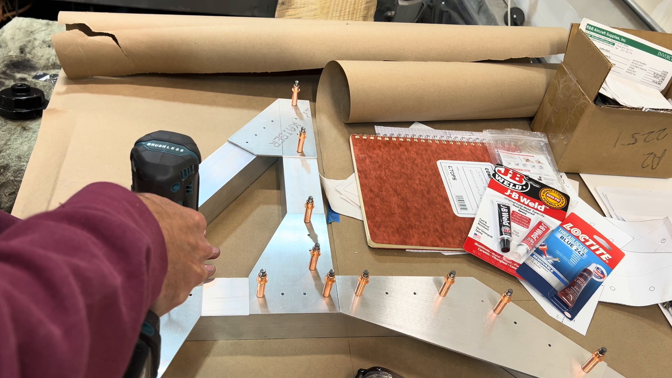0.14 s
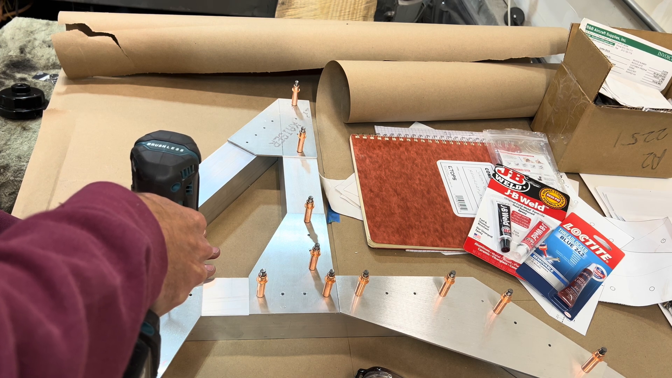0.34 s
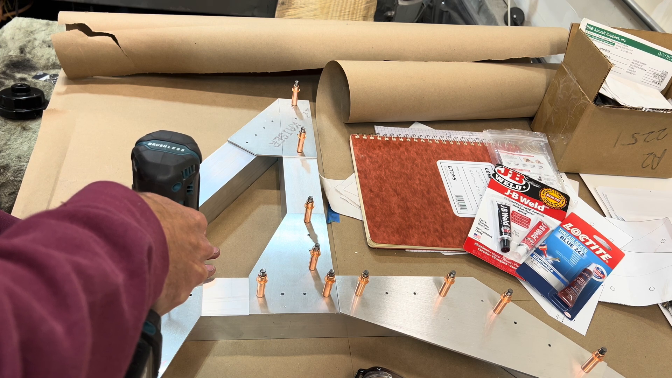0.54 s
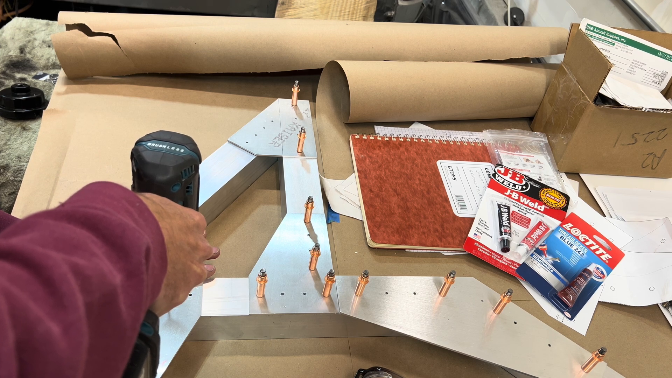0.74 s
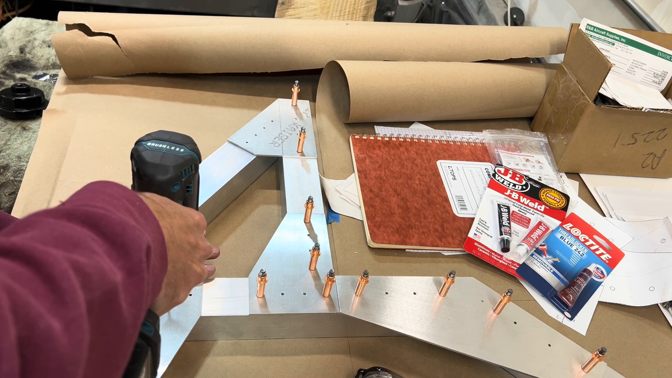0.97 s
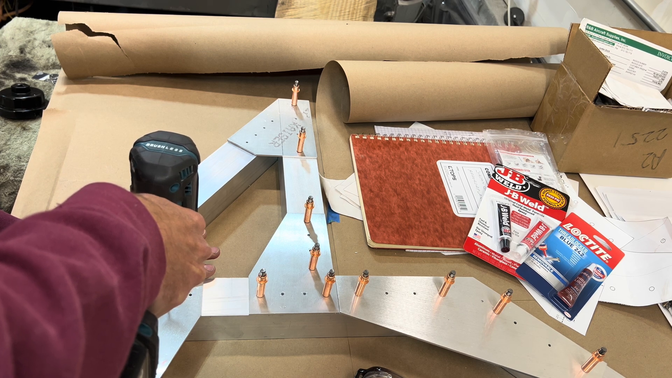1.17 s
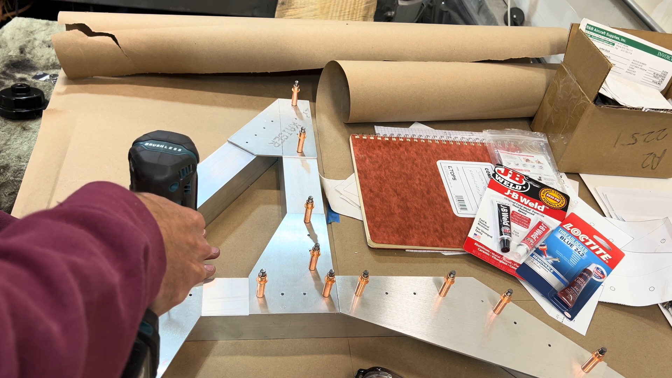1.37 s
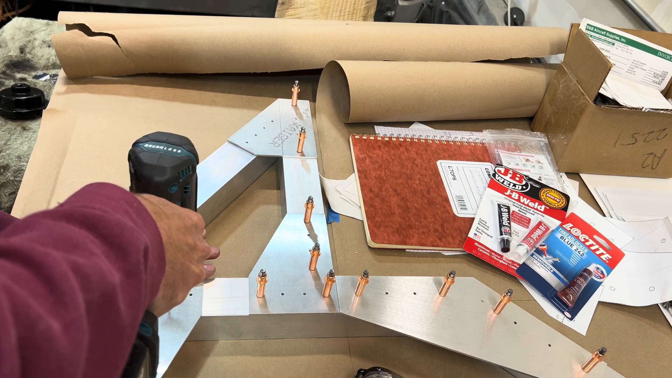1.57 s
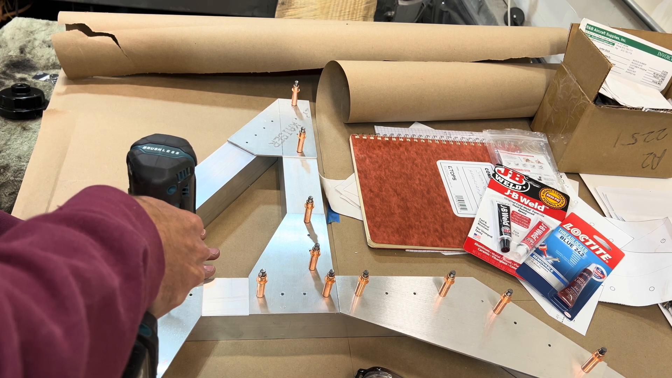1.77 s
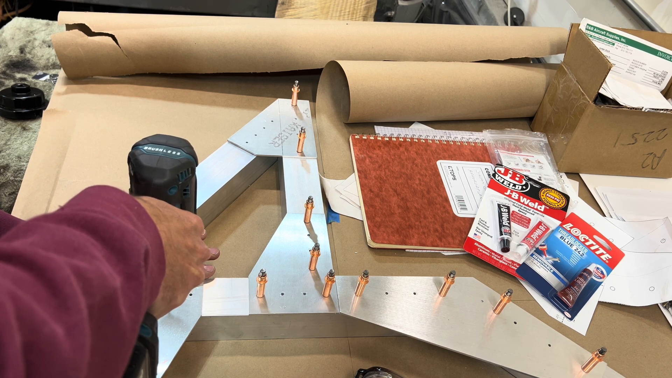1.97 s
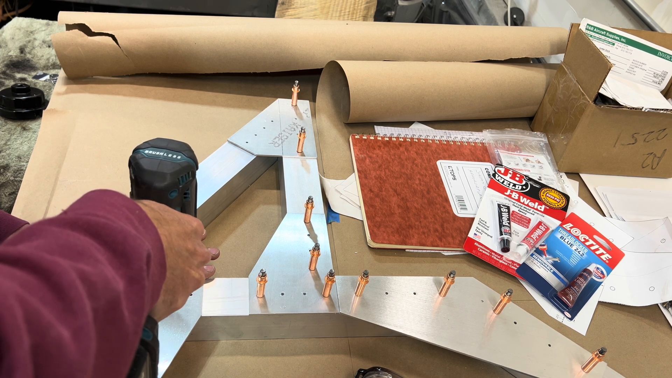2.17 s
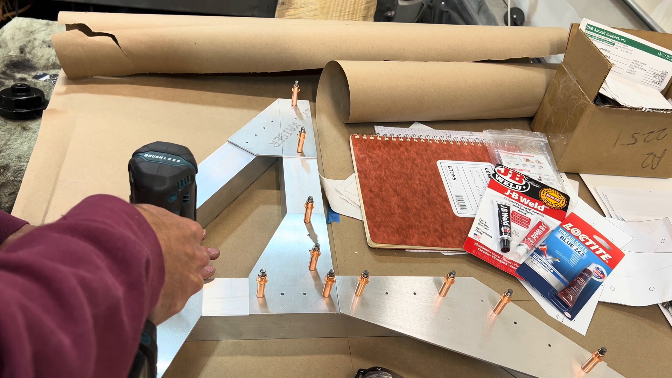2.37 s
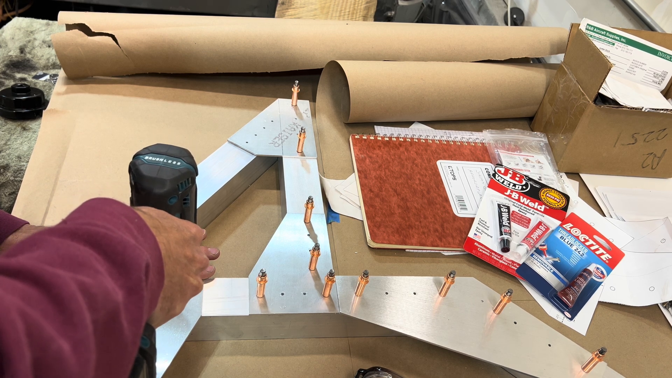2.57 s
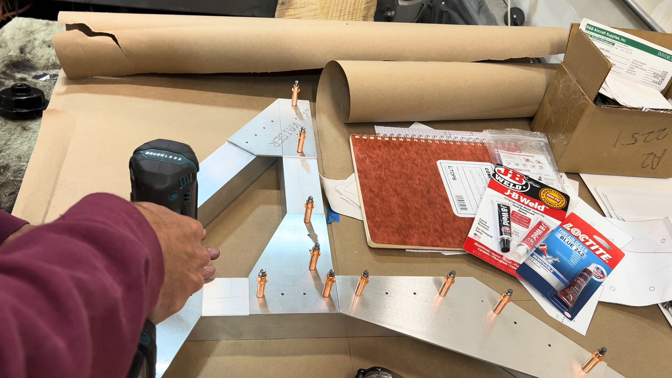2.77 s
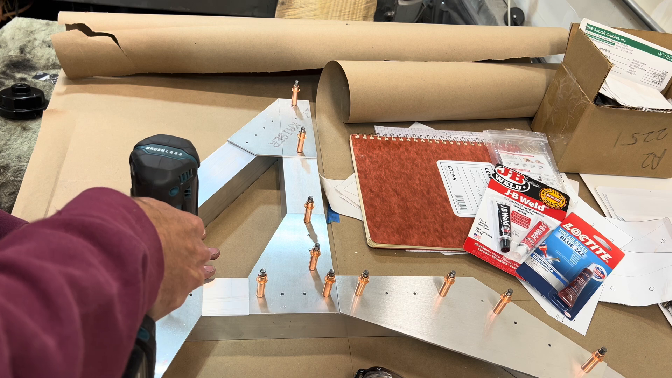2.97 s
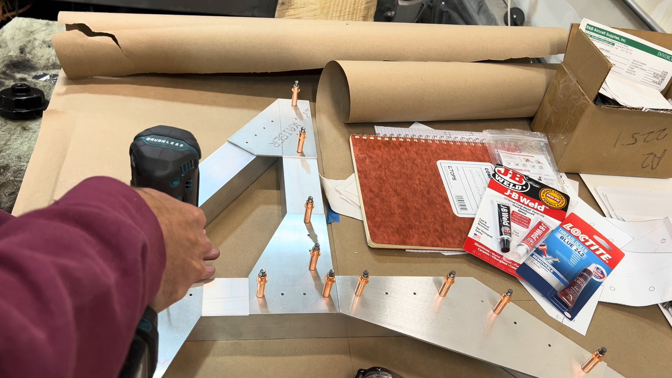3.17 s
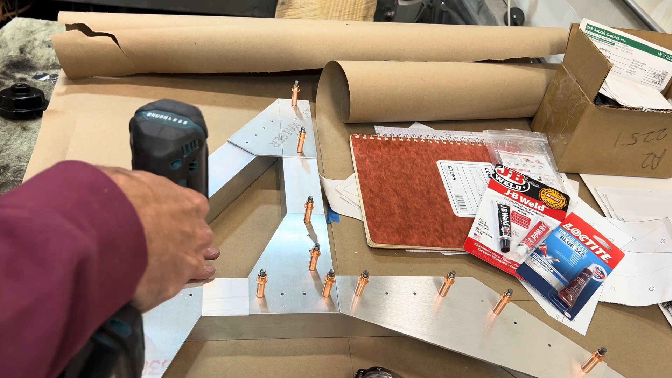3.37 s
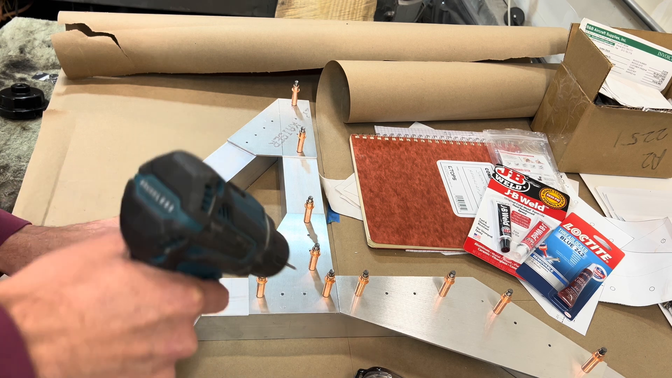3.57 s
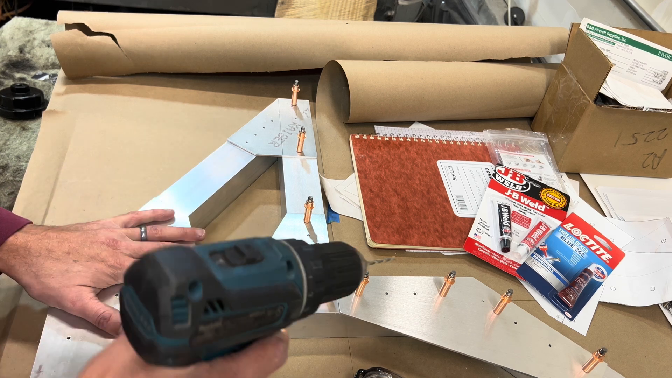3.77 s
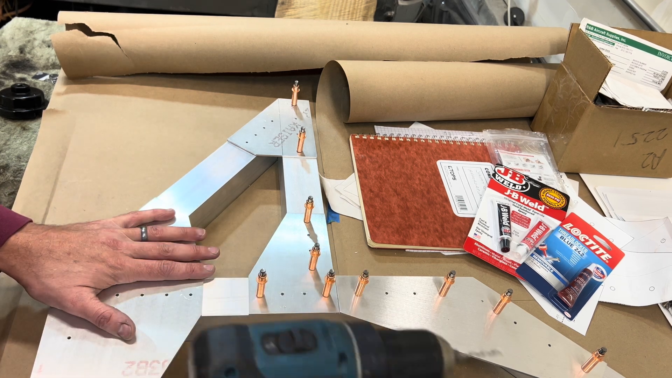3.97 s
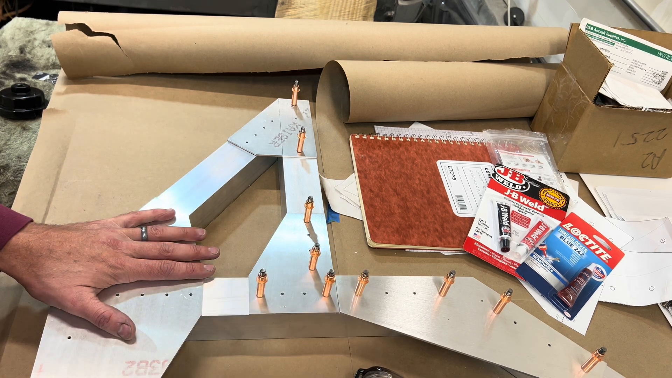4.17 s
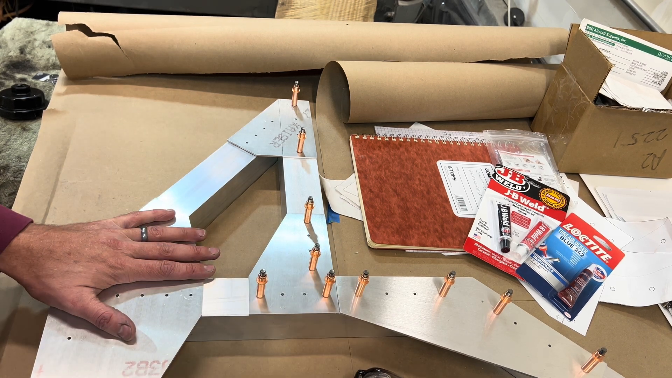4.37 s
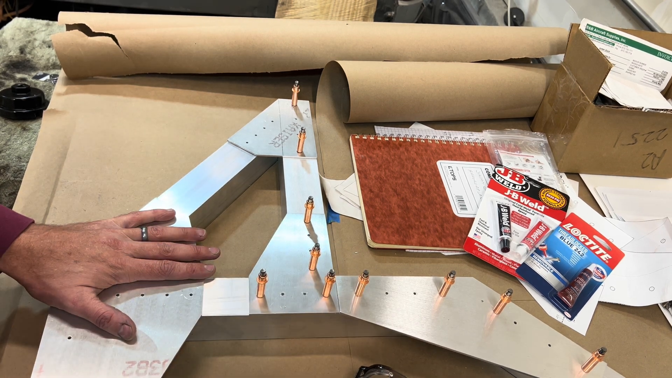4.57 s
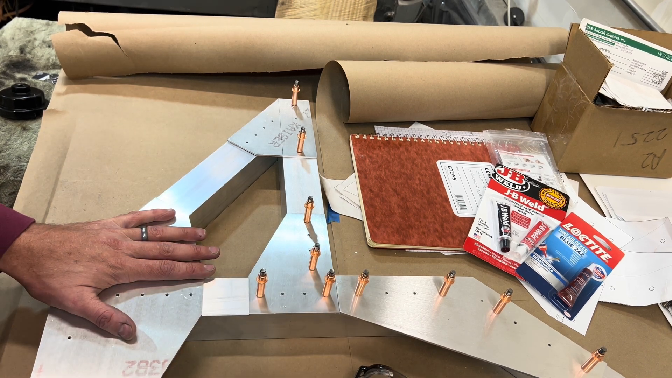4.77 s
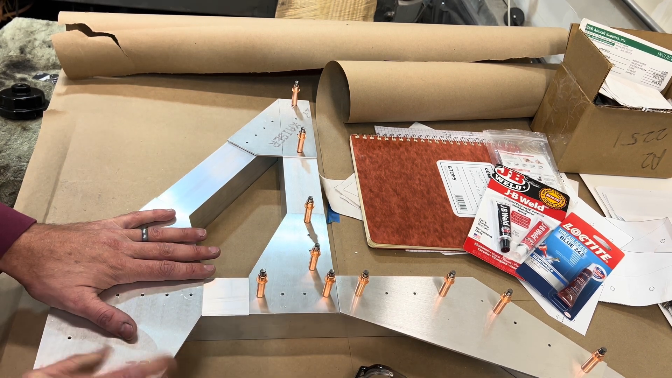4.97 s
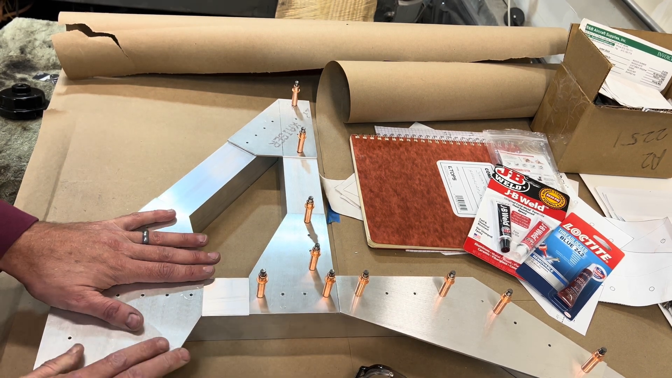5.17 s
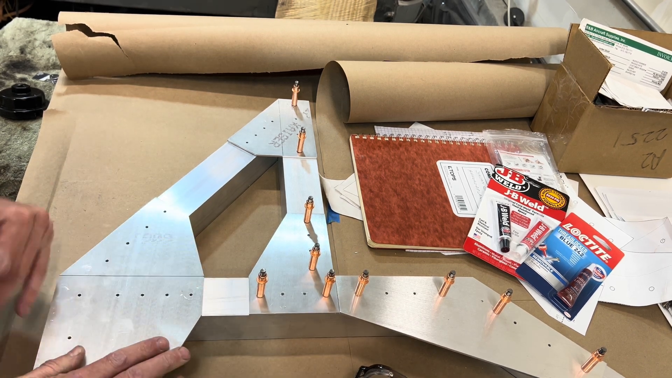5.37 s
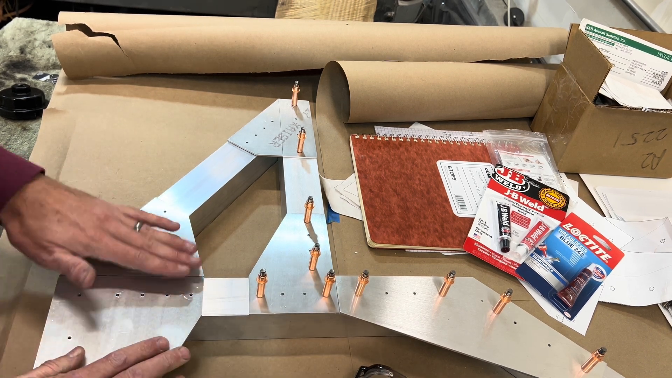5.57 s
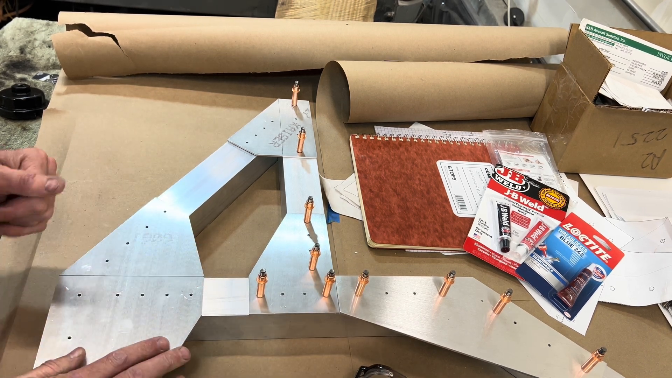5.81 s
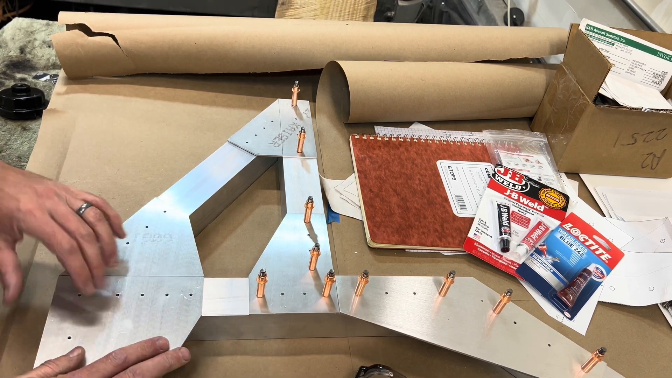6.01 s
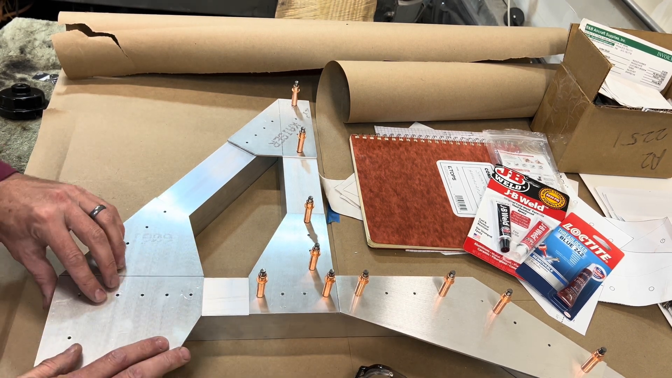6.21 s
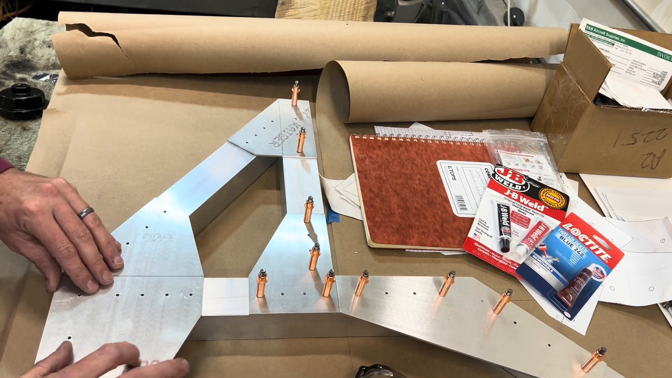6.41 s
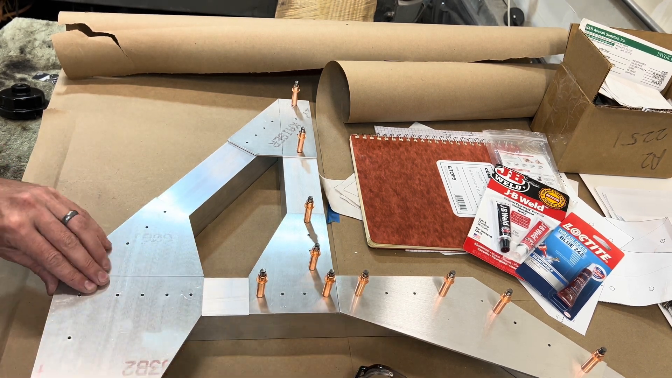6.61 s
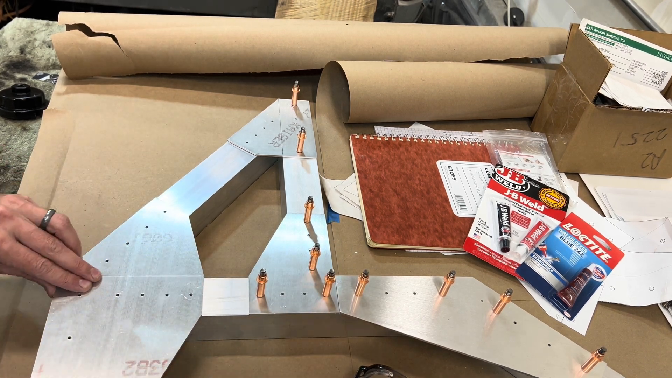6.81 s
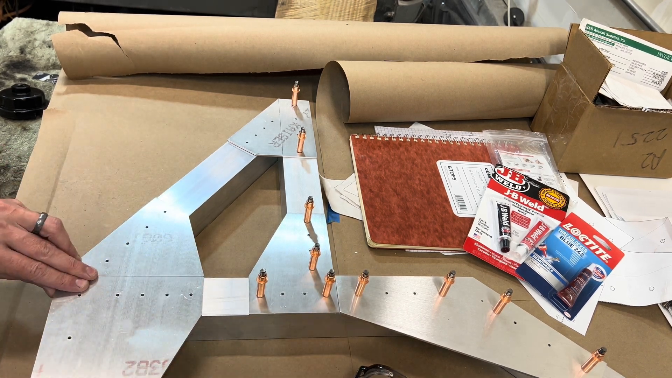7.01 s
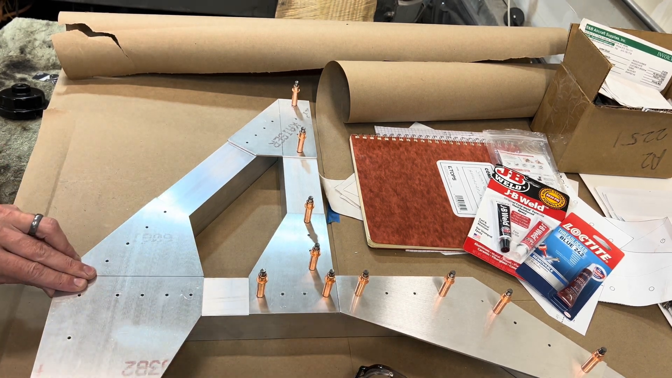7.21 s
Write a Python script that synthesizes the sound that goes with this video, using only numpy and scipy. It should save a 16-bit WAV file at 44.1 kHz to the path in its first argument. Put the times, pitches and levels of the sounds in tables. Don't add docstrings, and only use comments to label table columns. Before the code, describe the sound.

A close stereo pickup in a small, lightly reverberant workshop. From 0 to about 3.4 seconds a cordless drill bores steadily through aluminium sheet: dense, bright gear rattle, metallic cutting hiss, a throbbing whine around 1.2 kHz with thinner high tones, and low bench shaking. The pitch sags slightly near 1.5 seconds, then recovers. Around 3.4 the motor brakes abruptly, leaving faint cloth rubbing and quiet room air. At 4.27 the tool lands with a strong, hollow bench thud and a hard plastic click, followed until about 5.4 by weaker rocking thuds, knocks, clicks and low booming. Airy palm wipes and paper scrapes swell near 5.25 and 5.65, with small ticks. Softer taps and brushing continue from 6.1. At 6.55 the sheet gives a sharp, bright snap with tiny bounces, slightly left, then light sliding fades to about 7 seconds.

```python
import sys
import numpy as np
from scipy import signal
from scipy.fft import rfft, irfft
from scipy.io import wavfile
from scipy.ndimage import uniform_filter1d

SR = 44100
rng = np.random.default_rng(int(sys.argv[2]) if len(sys.argv) > 2 else 0)


def voltage_ratio(level):
    return 10 ** (np.asarray(level, float) / 20)


def to_wav(s):
    ch = np.atleast_2d(s).T
    pcm = np.round(np.clip(ch, -1, 1) * 32767)
    wavfile.write(sys.argv[1], SR, pcm.astype(np.int16))


N = 319725
T = np.arange(N) / SR
HZ = np.fft.rfftfreq(N + 8192, 1 / SR)
SIDES = np.array([[.5], [-.5]])

# pitch_hz, level_db
AIR_COLOUR = [(15, -41), (25, -11), (70, -2.5), (193, -18), (517, -18), (846, -28), (1610, -16),
              (2970, -31), (9000, -37), (12500, -42.5), (16000, -50.5)]
# pitch_hz, t60_s
SHOP_DECAY = [(100, 0.49), (400, 0.31), (1200, 0.51), (3000, 0.55), (5000, 0.43), (9000, 0.4),
              (12000, 0.11)]
# pitch_hz, left_lead_rad
PORT_LEAD = [(0, 0), (150, 0), (300, -.2), (1120, 1.9), (2050, 3), (3100, 3.85), (3800, 5.9), (6500, 6.9),
             (7200, 9.2), (8600, 6.3), (10200, 3.1), (11900, 0), (13700, -3.1), (15300, -6.3)]
# pitch_hz, likeness_0_to_1
PORT_LIKENESS = [(60, .99), (150, .74), (400, .5), (1200, .75), (2200, .9), (3100, .92), (4200, .94),
                 (5500, .75), (7000, .45), (8700, .7), (10000, .85)]
# pitch_hz, left_minus_right_db
PORT_TILT = [(60, -3), (110, -0.5), (200, 4.5), (380, -0.5), (700, 1.5), (1290, -0.1), (2380, 1.13),
             (4400, 3), (8120, 2.5), (15000, -3)]
# pitch_hz, gap_db
WEAK_SIDE_GAP = [(1500, -30), (1850, -10), (2100, -12.5), (2350, -13), (2650, -11), (3000, -14),
                 (4000, -19), (6500, -12), (7300, -4), (8000, -7), (9000, -8), (9700, -3.5), (16000, -2.5)]

# pitch_hz, level_db_per_hz
WIPE_COLOUR = [(1180, -38), (2000, -5), (2900, -7.5), (3900, -4), (6000, -2.5), (7300, -6.5), (8730, -4.5),
               (12000, -5), (16000, -13.5)]
# pitch_hz, level_db_per_hz
SCRAPE_COLOUR = [(130, -12.5), (350, -15), (800, -7.5), (1200, -10), (2100, -5.5), (2550, -9.5),
                 (2800, -16.5), (5000, -41)]
# pitch_hz, level_db_per_hz
BOOM_COLOUR = [(25, -32.5), (45, -5.5), (62, 0.5), (79, -0.5), (95, -3), (125, -9), (200, -8.5), (300, -30),
               (500, -87)]
# pitch_hz, level_db_per_hz
RUMBLE_COLOUR = [(90, -2), (160, -1.5), (300, 6.5), (500, -4.5), (750, -30.5), (1500, -59.5)]
# pitch_hz, width_hz, level_db
CLOTH_PEAKS = [(2340, 520, -3), (2640, 1250, 3.5), (3780, 320, -8), (6260, 1400, -6.5)]
# time_s, level_db
SLEEVE_CURVE = [
    (3.6, -78.5),
    (3.626, -68),
    (4.036, -77.5),
    (4.28, -86),
    (4.414, -77),
    (5.078, -75.5),
    (5.2, -67),
]
# full_s, rise_s, hold_s, level_db, t60_s
WIPE_STROKES = [(3.44, .01, 0.0059, -49.5, 0.53), (3.83, 0.14, 0.049, -71, 0.8),
                (4.27, 0.026, 0.027, -66.5, 0.8), (4.53, 0.02, 0.0029, -66, 0.13),
                (4.67, .01, 0.0043, -65.5, 1.4), (4.8, .02, .02, -68, .12), (5.08, 0.15, 0.0046, -65, 0.41),
                (5.25, 0.079, 0.083, -47, 0.18), (5.35, .03, .01, -60.5, 0.47),
                (5.617, 0.0053, 0.023, -59.5, .1), (5.645, 0.028, 0.056, -47.5, 0.09),
                (5.72, .03, 0.0091, -60, 0.4), (6.14, 0.054, 0.014, -67.5, 0.14),
                (6.24, 0.0198, 0.085, -70.5, 0.38), (6.37, 0.064, 0.037, -73, 0.16),
                (6.48, 0.042, 0.0064, -65.5, 0.099), (6.56, 0.0075, 0.0044, -63, 0.6),
                (6.66, 0.29, 0.052, -61, 0.68), (6.9, 0.43, 0.098, -77.5, 2.)]
# full_s, rise_s, hold_s, level_db, t60_s
DRAG_STROKES = [(3.44, 0.011, 0.0098, -52.5, 0.69), (4.225, 0.0035, 0.012, -66.5, 0.38),
                (3.85, .1, 0.072, -72.5, 1.6), (4.275, 0.0058, 0.013, -54, 0.62),
                (4.53, 0.041, 0.0077, -58, 0.33), (4.67, 0.011, 0.012, -63, 2.2),
                (5.08, 0.17, .01, -60, 0.46), (5.25, 0.11, 0.0071, -48, 0.35),
                (5.34, .01, 0.015, -60, 0.69), (5.63, 0.036, 0.013, -55.5, 0.46),
                (6.14, 0.12, 0.016, -66.5, 0.77), (6.3, .08, 0.067, -69, 0.39),
                (6.48, 0.045, 0.029, -67.5, 1.2), (6.65, 0.012, 0.13, -59.5, 1.26),
                (7.0, .4, .2, -74.5, 2.)]
# full_s, level_db, t60_s
LEAN_SHIFTS = [(3.48, -66, 0.28), (3.799, -77, 4), (4.29, -42.5, 0.66), (4.431, -46.5, 0.32),
               (4.541, -45, 1), (4.63, -46.5, 0.72), (4.799, -44.5, 2.2), (4.999, -43, 1.6),
               (5.119, -46, 0.53), (5.27, -56.5, 0.46), (5.36, -48, 1.1), (5.651, -51, 0.45),
               (6.1, -54, 0.57), (6.68, -57, 1.1), (7.0, -67.5, 2.4)]
# full_s, level_db, t60_s
PAPER_SLIDES = [
    (3.55, -70, 1.6),
    (3.75, -68, 2.1),
    (4.44, -49, 1),
    (4.67, -49.5, 2.2),
    (5.08, -52.5, 0.33),
    (6.14, -73.5, 1.4),
    (6.75, -62.5, 2.6),
]

# start_s, peak_db, pitch_hz, t60_s
KNOCK_HITS = [(4.2245, -41.5, 2400, 0.056), (4.2245, -53.5, 3780, 0.05), (4.2247, -57.5, 4500, 0.034),
              (4.227, -63.5, 1000, .06), (4.226, -51.5, 1800, 0.035), (4.238, -46.5, 2740, 0.16),
              (4.24, -55.5, 3750, .03), (4.4388, -50.5, 4000, 0.032), (4.44, -51, 1900, 0.043),
              (4.509, -48, 2550, 0.09), (4.521, -49, 2670, 0.072), (4.55, -58, 2650, 0.17),
              (4.63, -65.5, 2650, 0.21), (4.29, -59, 2680, 0.22), (4.332, -46, 980, 0.055),
              (4.578, -55, 1570, .03), (4.838, -59, 1200, 0.014), (4.9495, -51.5, 950, 0.016),
              (5.037, -59, 1040, 0.016), (5.073, -47, 860, 0.032), (5.243, -42, 2000, 0.045),
              (5.245, -40, 4310, 0.058), (5.25, -46, 1250, 0.061), (5.255, -43, 810, 0.042),
              (5.333, -40.5, 456, 0.051), (5.334, -43.5, 760, .07), (5.334, -44, 1550, .03),
              (5.62, -48.5, 700, 0.044), (6.073, -62.5, 794, 0.039), (6.128, -60, 1100, .05),
              (6.321, -58, 704, .03), (6.324, -55, 493, 0.044), (6.394, -58, 450, 0.028),
              (6.078, -72.5, 4830, 0.04), (6.37, -72.5, 4850, .15), (6.24, -68.5, 3630, 0.13),
              (6.138, -65, 3700, 0.032), (6.471, -63, 1760, 0.039), (7.165, -65, 732, 0.059)]
# start_s, peak_db, pitch_hz, left_minus_right_db, bright_edge_db
CLICK_HITS = [(4.2243, -53.5, 2700, 17.5, -28.5), (4.2394, -56, 4400, 7, -25), (4.264, -58, 7000, 11, -6.5),
              (4.2717, -33.5, 802, 11, -23.5), (4.4393, -50.5, 3950, 8.5, -26),
              (4.5106, -53.5, 2650, 9, -33.5), (4.5244, -53, 2340, 14, -25), (4.534, -61, 7000, 8, -2),
              (4.579, -61, 2600, 13, -17.5), (4.6668, -37, 851, 10, -5), (4.7994, -51, 5970, 7, -1),
              (4.9487, -61, 3850, 12, -14), (4.9616, -53.5, 2050, 11, -27.5), (5.0764, -45, 3650, 1, -15.5),
              (5.1706, -54, 3420, 6, -17), (5.1841, -45, 4340, 0.5, -25), (5.2405, -39, 4240, 10, -18),
              (5.6206, -49, 827, -3, -11), (5.6361, -43, 5200, 10, -12), (6.0721, -53.5, 829, 2.5, -15),
              (6.5472, -33.5, 4500, 19.5, 12), (6.6405, -49.5, 1900, 9, -22)]
# pitch_hz, width_hz, level_db
SHELL_PEAKS = [(1890, 190, 0), (2650, 150, 21), (3780, 170, -11), (4510, 520, -30)]
# pitch_hz, level_db, t60_s
SNAP_MODES = [(1190, -16, .2), (1700, 6.5, .032), (1790, -9, .02), (2083, -6, .045), (2304, -7, .09),
              (2654, -1.5, .045), (2988, -5, .05), (3978, -6, .04), (4377, -5, .03), (4823, -5, .02),
              (5600, -4, .012), (6700, -4, .012), (8600, -6, .012)]
# start_s, level_db, loud_low_mode_db
SNAP_HITS = [
    (6.5481, -31, 6.5),
    (6.5604, -31.5, -19),
    (6.563, -39.5, -17.5),
]
# full_s, peak_db, pitch_hz, length_s
BENCH_SWAYS = [(4.298, -29.5, 72, .07), (4.345, -35.5, 75, .06), (4.397, -31.5, 75, .08),
               (4.45, -42, 65, .07), (4.605, -32.5, 79.4, .17), (4.708, -38, 58, .06),
               (4.752, -41, 62, .06), (4.82, -37, 75.4, .08), (4.914, -41, 76, .1),
               (4.998, -37.5, 80.3, .08), (5.064, -37.5, 70, .07), (5.125, -40, 80.4, .09),
               (5.272, -50, 77.2, .06), (5.36, -46, 70, .09), (5.46, -45, 84.5, .06),
               (5.53, -48, 84.5, .07), (5.665, -46, 87, .1)]
# start_s, peak_db, pitch_hz, t60_s
THUD_HITS = [(4.2721, -14, 228.6, 0.25), (4.327, -31, 233, 0.16), (4.373, -21.5, 223, 0.18),
             (4.401, -34, 221, 0.052), (4.521, -22, 243, 0.25), (4.671, -23.5, 237, 0.2),
             (4.798, -28, 213.6, 0.12), (4.87, -36.5, 122, 0.22), (4.972, -35.5, 199, 0.14),
             (5.048, -35.5, 189, 0.11), (5.122, -32.5, 222, 0.075), (5.249, -36.5, 217, 0.074),
             (5.298, -42, 183, 0.061), (5.346, -32, 234, 0.26), (5.367, -34, 216, 0.086),
             (5.437, -38.5, 170.6, 0.15), (5.618, -49, 150, 0.44), (5.641, -44.5, 178, 0.083),
             (6.082, -53.5, 165, 0.16), (6.131, -53.5, 119.7, 0.17), (6.642, -49.5, 222, 0.16),
             (6.678, -45, 128.3, 0.048), (6.997, -60.5, 219, 0.14), (7.129, -61.5, 245, 0.19)]
# pitch_hz, level_db, t60_s
BENCH_MODES = [(165, -3, 0.16), (230, -8, 0.1), (285, 12.5, 0.023), (344.2, -2, 0.17), (450, -1, 0.11),
               (570, 16, 0.011), (944, -36.5, 0.054)]

# time_s, whine_db, bench_shake_db
DRILL_CURVE = [
    (0, -54.5, -48),
    (.5, -54, -48.5),
    (1.2, -52.5, -46.5),
    (1.55, -54.5, -45.5),
    (1.75, -50, -50),
    (2.0, -53, -49),
    (2.5, -46.5, -56),
    (3.05, -51, -44),
    (3.2, -60.5, -56.5),
    (3.44, -58.5, -81),
]
# time_s, pole_whine_hz
MOTOR_SPEED = [(0, 1179.6), (.5, 1178.4), (1.2, 1174.3), (1.4, 1171), (1.48, 1166), (1.58, 1168),
               (1.7, 1174.3), (2.0, 1178.3), (2.75, 1181.5), (3.05, 1178.8), (3.4, 1182)]
# pitch_hz, width_hz, level_db
HOUSING_PEAKS = [(3150, 380, -0.5), (4204, 445, 3), (4576, 550, -0.5), (4882, 326, 4)]
# pitch_hz, level_db_per_hz
CUTTING_COLOUR = [(300, -35), (600, -26), (1000, -17.5), (2200, -10.5), (3600, -16), (5600, -23.5),
                  (7000, -19.5), (9500, -22.5), (13000, -25), (16000, -25)]
# pitch_hz, level_db_per_hz
SHAKE_COLOUR = [(15, -51.5), (25, -19.5), (44, 4), (124, -3.5), (169, 7), (217, -2.5), (308, -1),
                (339, 7.5), (369, -3.5), (436, -4.5), (700, -31.5), (910, -47.5), (1540, -120)]
# pole_whine_multiple, added_chopper_tones, left_db, left_lead_rad
WHINE_ORDERS = [(1.2483, 0, -53, .9), (1.5, 0, -63, 2.3), (2, 0, -56.5, 2.6), (2.4365, 0, -42.5, 4.6),
                (-1, 1, -52, 1.4), (0, 1, -58, -2.), (1, 1, -55, -2.2)]

HANDS_FROM_S, PALM_FROM_S = 3.42, 4.6
HANDS_PAN_DB = 5.2


def evened(x):
    return x / np.sqrt(np.mean(x ** 2) + 1e-20)


def read(points, hz):
    f, value = np.transpose(points)
    return np.interp(np.log(hz + 1), np.log(f + 1), value)


def filtered(x, gain):
    return irfft(rfft(x, N + 8192) * gain, N + 8192)[..., :N]


def highpass(hz, order):
    return 1 / (1 + (hz / (HZ + 1)) ** order)


def peaks(modes):
    return abs(sum(voltage_ratio(db) / (1 + 2j * (HZ - hz) / width) ** 1.645 for hz, width, db in modes))


def controls(rows):
    s, *columns = np.transpose(rows)
    gate = uniform_filter1d(1. * ((T >= s[0]) & (T <= s[-1])), size=400)
    return gate, [np.interp(T, s, c) for c in columns]


def flicker(size):
    return evened(uniform_filter1d(uniform_filter1d(rng.standard_normal(N), size), size))


def noise(spectrum, grain_db=0., size=60):
    grainy = rng.standard_normal((2, N)) * voltage_ratio(grain_db * flicker(size))
    return evened(filtered(grainy, voltage_ratio(read(spectrum, HZ))))


def patchy(x, patch_db):
    z = signal.stft(x, SR, nperseg=256)[2]
    field = uniform_filter1d(rng.standard_normal(z.shape[1:]), size=2, axis=0)
    field = evened(uniform_filter1d(field, size=14, axis=1))
    return evened(signal.istft(z * voltage_ratio(patch_db * field), SR, nperseg=256)[1][:, :N])


def ring(modes, stretch=1., size=12000):
    t = T[:size]
    return sum(voltage_ratio(db - 60 * t / (t60 * stretch)) * np.sin(2 * np.pi * hz * t) for hz, db, t60 in modes)


def add(mix, s, sound):
    part = mix[..., round(s * SR):][..., :sound.shape[-1]]
    part += sound[..., :part.shape[-1]]


def panned(x, db):
    return x * voltage_ratio(SIDES * db)


def ports(pair):
    same = np.clip(read(PORT_LIKENESS, HZ), 0, 1)
    tilt = voltage_ratio(read(PORT_TILT, HZ) / 2)
    lag = np.exp(-1j * np.interp(HZ, *np.transpose(PORT_LEAD)))
    right = filtered(pair[0], same * lag / tilt) + filtered(pair[1], np.sqrt(1 - same ** 2) / tilt)
    return np.array([filtered(pair[0], tilt), right])


def smeared(x):
    taps = rng.standard_normal(300) * np.exp(-np.arange(300) / 60.)
    return np.array([x, signal.oaconvolve(x, taps / np.linalg.norm(taps))[:N]])


def shop(x):
    hz, t, z = signal.stft(rng.standard_normal((2, SR)), SR, nperseg=256)
    fade = voltage_ratio(-60 * t / read(SHOP_DECAY, hz)[:, None])
    tail = signal.istft(z * fade, SR, nperseg=256)[1]
    tail = np.pad(tail / np.linalg.norm(tail[0]), ((0, 0), (300, 0)))
    return signal.fftconvolve(x, tail, axes=1)[:, :N]


def workshop_air():
    return voltage_ratio(-72.5) * ports(noise(AIR_COLOUR))


def touches(rows):
    power = 0
    for s, rise, hold, db, t60 in rows:
        swell_db = 29.5 * np.maximum(s - T, 0) / rise
        fade_db = 60 * np.maximum(T - s - hold, 0) / t60
        power = power + voltage_ratio(db - swell_db - fade_db) ** 2
    return np.sqrt(power) * (T > HANDS_FROM_S)


def hands():
    brush, drag = touches(WIPE_STROKES), touches(DRAG_STROKES)
    lean = touches([(s, .014, .013, db, t60) for s, db, t60 in LEAN_SHIFTS])
    slide = touches([(s, .26, .01, db, t60) for s, db, t60 in PAPER_SLIDES])
    wipe = patchy(noise(WIPE_COLOUR, grain_db=0.8, size=80), patch_db=2.0)
    fizz = filtered(wipe, highpass(8800, 16))
    palm_fizz = np.minimum(brush / voltage_ratio(-58), 1) * (T > PALM_FROM_S)
    sleeve_fizz = 0.38 * (T > SLEEVE_CURVE[0][0])
    wipe = wipe - fizz * (1 - np.maximum(palm_fizz, sleeve_fizz))
    scrape = patchy(noise(SCRAPE_COLOUR, grain_db=2.0, size=150), patch_db=1.7)
    held, (sleeve_db,) = controls(SLEEVE_CURVE)
    cloth = evened(filtered(rng.standard_normal((2, N)), peaks(CLOTH_PEAKS)))
    rub = brush * wipe + drag * scrape
    rub += held * voltage_ratio(sleeve_db + 5.5 + 1.9 * flicker(300)) * cloth
    boom = lean * noise(BOOM_COLOUR, size=900)
    boom += slide * noise(RUMBLE_COLOUR, grain_db=1.0, size=500)
    return panned(ports(rub), HANDS_PAN_DB) + ports(boom)


def knocks():
    out, t = np.zeros(N), T[:4000]
    for s, db, hz, t60 in KNOCK_HITS:
        puff = rng.standard_normal(len(t)) * voltage_ratio(-60 * t / (.5 * t60))
        knock = np.convolve(puff, ring([(hz, 0, 0.52 * t60)], size=2000))[:len(t)]
        knock = knock * (1 - np.exp(-t / .001))
        add(out, s, voltage_ratio(db) * knock / abs(knock).max())
    return out


def clicks():
    out, t = np.zeros((2, N)), T[:4000]
    shell = np.roll(irfft(peaks(SHELL_PEAKS)), 100)[:200] * np.hanning(200)
    for s, db, hz, pan_db, edge_db in CLICK_HITS:
        first_touch_db = 3.8 * (np.arange(100) < 2)
        grains = voltage_ratio(6.7 * rng.standard_normal(100) + first_touch_db).repeat(40)
        burst = rng.standard_normal(len(t)) * voltage_ratio(-60 * t / .055) * grains
        own = signal.lfilter(*signal.iirpeak(hz, 4., SR), burst)
        edge = signal.lfilter([1, 0, 0, -1], [1], rng.standard_normal(len(t))) * voltage_ratio(-60 * t / .009)
        reach = np.clip((hz - 700) / (2200 - 700), .2, 1)
        through_shell = evened(np.convolve(burst, shell)[90:])[:len(t)]
        tick = reach * through_shell + evened(own) + voltage_ratio(edge_db) * evened(edge)
        add(out, s, panned(voltage_ratio(db) * tick / abs(tick).max(), pan_db))
    return out


def sheet_snap():
    out = np.zeros((2, N))
    for s, db, low_db in SNAP_HITS:
        crack = rng.standard_normal(300) * voltage_ratio(-60 * T[:300] / .0015)
        low_mode = ring(SNAP_MODES[1:2], size=6000)
        metal = ring(SNAP_MODES, size=6000) + (voltage_ratio(low_db) - 1) * low_mode
        snap = np.convolve(metal, crack / np.linalg.norm(crack))
        add(out, s, panned(voltage_ratio(db) * snap / 4, 8))
    return out


def sways():
    out = np.zeros(N)
    for s, db, hz, length in BENCH_SWAYS:
        t = T[:round(length * SR)]
        swell = np.sin(np.pi * t / length) ** 2
        add(out, s - length / 2, voltage_ratio(db) * swell * np.sin(2 * np.pi * hz * t))
    return out


def thuds():
    out, t = np.zeros(N), T[:12000]
    slap_band = signal.butter(2, [300, 750], "band", fs=SR)
    for s, db, hz, t60 in THUD_HITS:
        push = np.sin(2 * np.pi * hz * t * (1 + 0.69 * np.exp(-t / 0.0088))) * voltage_ratio(-60 * t / 0.065)
        slap = signal.lfilter(*slap_band, rng.standard_normal(len(t)))
        slap = slap * voltage_ratio(1.3 * (db - THUD_HITS[0][1]) - 60 * t / 0.084)
        blow = push + 0.2 * ring(BENCH_MODES, t60 / 0.23) + 0.64 * slap
        blow = blow * (1 - np.exp(-(t / 0.0034) ** 2))
        add(out, s - .001, voltage_ratio(db) * blow / abs(blow).max())
    return out


def gear_rattle(turns):
    rattle_db = -27.5 - 416 * np.maximum(T - 3.41, 0)
    flutes = 1 + 0.042 * np.cos(turns / 20)
    teeth = rng.standard_normal((2, N)) * voltage_ratio(1.35 * flicker(50) + 0.41 * flicker(900)) * flutes
    colour = peaks(HOUSING_PEAKS) + voltage_ratio(read(CUTTING_COLOUR, HZ))
    return voltage_ratio(rattle_db + 2.5) * patchy(filtered(teeth, colour), patch_db=1.2)


def motor_whine(turns, pole_hz, whine_db):
    chopper_hz, brush_order = 7991, 5.994
    throb = 1 + 0.45 * np.cos(2 * np.pi * 4.68 * (T - 0.414))
    current = np.clip((3.4 - T) / .15, 0, 1)
    current = current * voltage_ratio(.7 * np.minimum(pole_hz - 1175.5, 0))
    brush_db = -49.5 + 2.5 * flicker(2500)
    whine = throb * voltage_ratio(whine_db + 11.0) * np.cos(turns + 1.9 * SIDES)
    whine += current ** .75 * voltage_ratio(brush_db + 6.) * np.cos(brush_order * turns - 1.8 * SIDES)
    for k, chopped, db, lead in WHINE_ORDERS:
        phase = k * turns + chopped * 2 * np.pi * chopper_hz * T + lead * SIDES
        phase = phase + .45 * flicker(1500)
        whine += current * voltage_ratio(db + 1.5 + 3. * flicker(4000)) * np.cos(phase)
    return panned(whine, 2)


def drill():
    gate, (whine_db, shake_db) = controls(DRILL_CURVE)
    pole_hz = np.interp(T, *np.transpose(MOTOR_SPEED))
    turns = 2 * np.pi * np.cumsum(pole_hz + .4 * flicker(3000)) / SR
    shake = voltage_ratio(shake_db) * noise(SHAKE_COLOUR, grain_db=1.0, size=1500)
    body = ports(gate * (gear_rattle(turns) + shake))
    return body + gate * motor_whine(turns, pole_hz, whine_db)


def scene():
    handling = hands() + panned(ports(smeared(knocks())), HANDS_PAN_DB)
    ticks = filtered(clicks() + sheet_snap(), highpass(1100, 8))
    ticks = np.array([ports(smeared(x))[k] for k, x in enumerate(ticks)])
    ticks = ticks + voltage_ratio(-29) * shop(ticks)
    thud = thuds()
    blows = np.array([thud + sways(), .6 * np.roll(thud, 45)])
    blows = ports(blows + voltage_ratio(-11) * shop(thud * np.ones((2, 1))))
    blows = panned(blows, -.8)
    tool = drill()
    tool = tool + voltage_ratio(-16.5) * shop(tool)
    return workshop_air() + handling + ticks + blows + tool


def thinned(x):
    mid_side = np.array([x[0] + x[1], x[0] - x[1]]) / 2
    hz, _, z = signal.stft(mid_side, SR, nperseg=2048)
    band_hz = hz[4::8, None]
    power = (abs(z[:, 1:]) ** 2).reshape(2, 128, 8, -1).mean(axis=2)
    wide = uniform_filter1d(uniform_filter1d(power, size=3, axis=1), size=3, axis=2)
    power = np.where(band_hz > 9400, wide, power)
    kept = power > power[::-1] * voltage_ratio(2 * read(WEAK_SIDE_GAP, hz[4::8]))[:, None]
    kept |= (power.max(axis=0) < voltage_ratio(-170)) & (band_hz < 9400)
    z[:, 1:] *= kept.repeat(8, axis=1)
    mid, side = signal.istft(z, SR, nperseg=2048)[1][:, :N]
    return np.array([mid + side, mid - side])


def top_cut(x):
    return signal.sosfilt(signal.butter(12, 15900, fs=SR, output="sos"), x)


def record(dry):
    mix = thinned(filtered(dry, highpass(36, 6)))
    return top_cut(mix)


dry = scene()
out = record(dry)
to_wav(out)
```